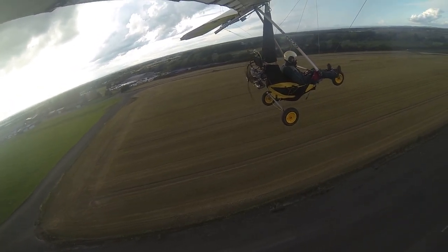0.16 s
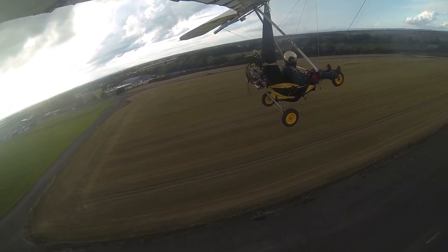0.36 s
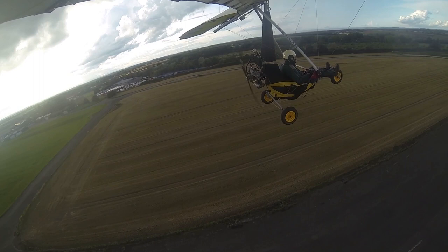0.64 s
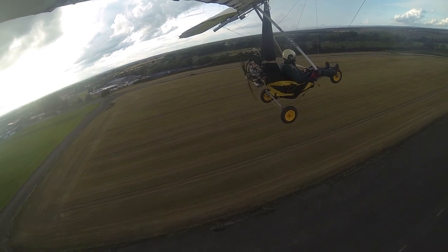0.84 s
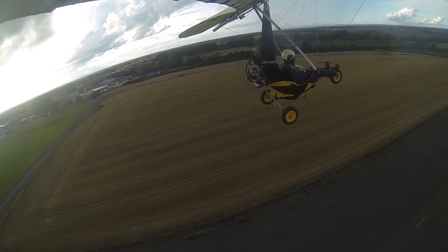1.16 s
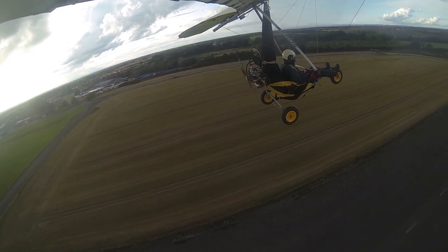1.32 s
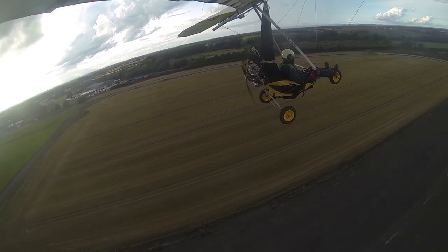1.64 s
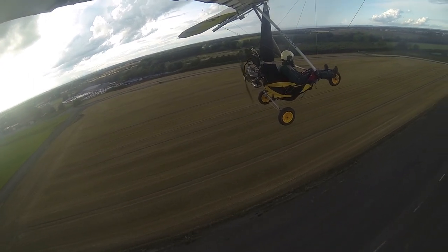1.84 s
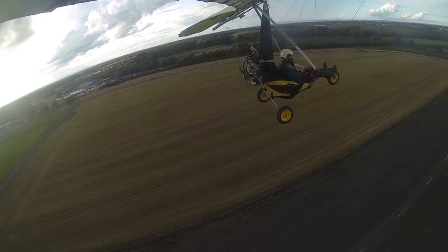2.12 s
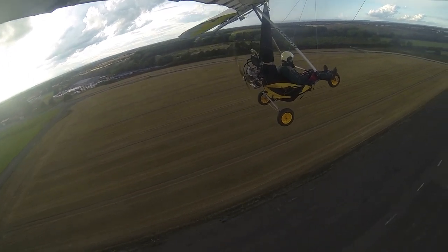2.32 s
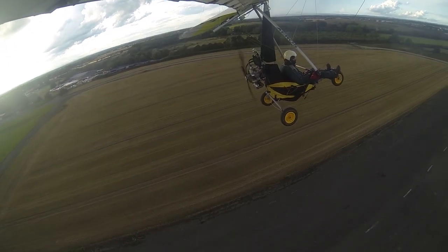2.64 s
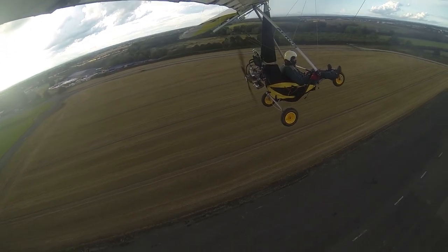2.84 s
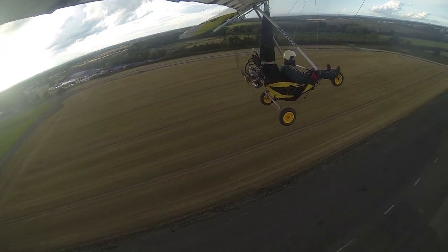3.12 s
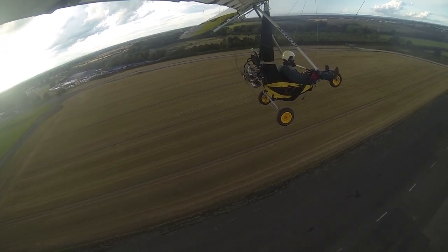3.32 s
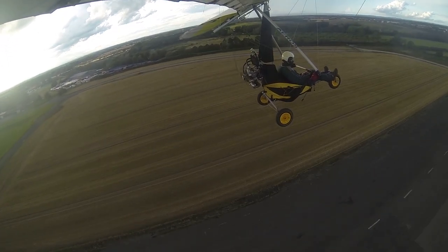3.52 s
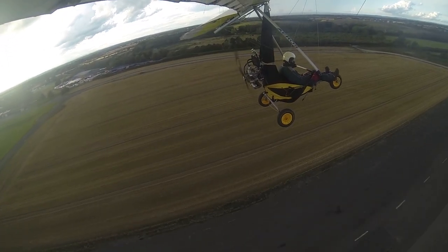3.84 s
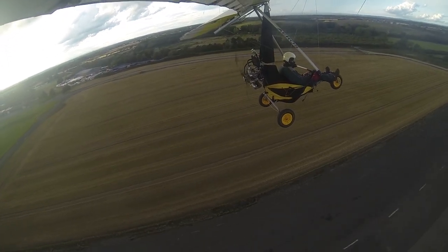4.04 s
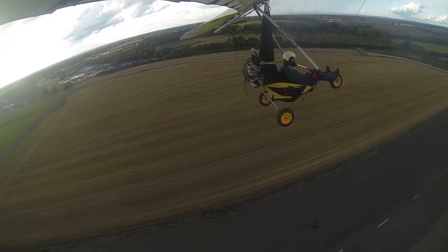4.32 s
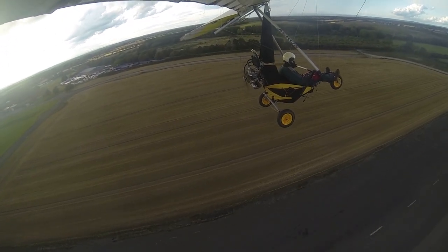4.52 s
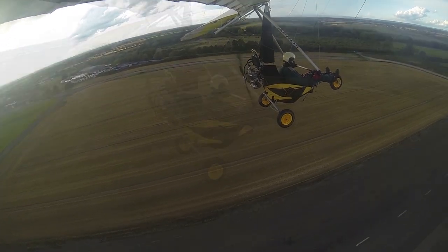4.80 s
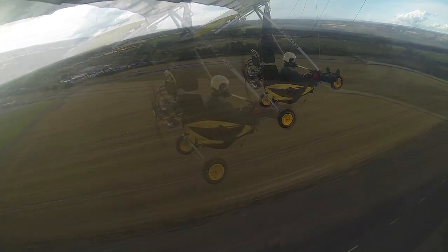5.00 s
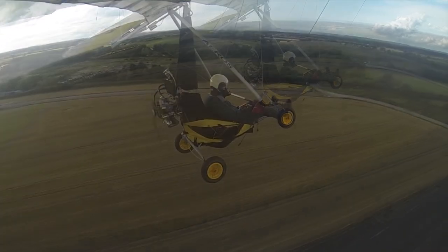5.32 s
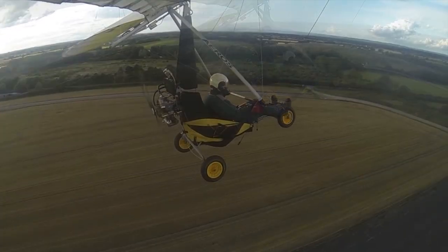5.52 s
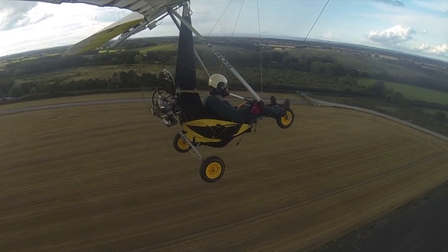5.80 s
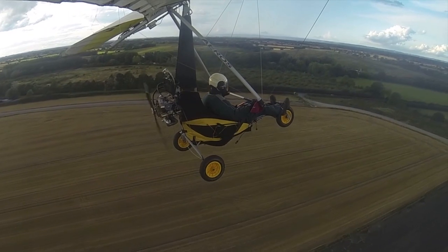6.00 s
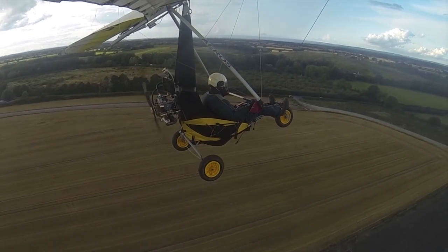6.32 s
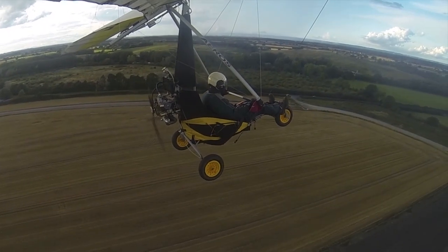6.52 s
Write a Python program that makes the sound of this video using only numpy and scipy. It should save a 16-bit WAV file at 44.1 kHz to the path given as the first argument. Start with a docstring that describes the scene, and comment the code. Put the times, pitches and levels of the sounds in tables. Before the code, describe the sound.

Heard from a housed microphone on the wing of a small open aircraft, an engine and propeller drone loudly and evenly. Rushing air runs underneath, with low wind rumble and short gusts that are strongest early on. Later the engine speeds up very slightly with a rough swell of air, and then everything drops smoothly to a lower level.

```python
"""The two-stroke engine of a microlight sings at full power, heard from a housed camera on the wing.
Its single cylinder fires evenly, so the exhaust makes clear tones and the metal rings faintly.
A belt-driven two-blade propeller pushes from behind: it thumps, chops the exhaust gas and slaps through
the wake. Air rushes past the climbing aircraft and buffets the camera housing.
Near the end the whole sound fades to a lower level."""
import sys
import numpy as np
from scipy import signal
from scipy.fft import rfft, irfft, next_fast_len
from scipy.io import wavfile

SR = 44100
rng = np.random.default_rng(int(sys.argv[2]) if len(sys.argv) > 2 else 0)


def pcm_store(signal):
    """Save signal as 16-bit PCM."""
    levels = np.round(np.clip(np.atleast_2d(signal), -1, 1) * 32767)
    wavfile.write(sys.argv[1], SR, levels.astype(np.int16).T)


N = 293706


def undb(db):
    """Turn decibels into a number to multiply by."""
    return 10 ** (np.asarray(db) / 20)


def level(x, db):
    """Scale a sound to an average (rms) level."""
    return x * undb(db) / np.sqrt(np.mean(x ** 2))


def colour(x, points):
    """Make some pitches louder and others softer, along a curve of (f/Hz, level/dB) points."""
    hz, db = np.transpose(points)
    size = next_fast_len(N)
    bin_hz = np.maximum(np.arange(size // 2 + 1) * SR / size, 1)
    gain = undb(np.interp(np.log(bin_hz), np.log(hz), db))
    return irfft(rfft(x, size) * gain, size)[:N]


def wobble(cycles):
    """A new random value at each whole cycle, joined by straight lines."""
    count = int(cycles[-1]) + 2
    return np.interp(cycles, np.arange(count), rng.standard_normal(count))


def tone(cycles, db):
    """A pure tone at an average (rms) level."""
    return np.sqrt(2) * undb(db) * np.cos(2 * np.pi * cycles)


def bump(t, at_s, length_s):
    """A bell-shaped rise and fall."""
    return np.exp(-((t - at_s) / length_s) ** 2)


def air_rush(t):
    """Air streams past the wing with a steady, slightly wavering hiss."""
    # tone colour of the rushing air: f/Hz, level/dB
    spectrum = [(30, -2.5), (130, -4), (350, -10), (600, -4.5), (850, 2), (1050, -6), (1300, -8),
                (2000, -16), (3300, -30), (6000, -34), (8000, -38), (9600, -33), (12500, -55),
                (14300, -64.5)]
    return level(colour(rng.standard_normal(N), spectrum), -13) * undb(0.58 * wobble(9 * t))


def air_swell(t, hz=178, width_hz=260):
    """One low, rough swell of air, timed to where the engine speeds up."""
    band = signal.iirpeak(hz, hz / width_hz, SR)
    rumble = signal.lfilter(*band, signal.lfilter(*band, rng.standard_normal(N)))
    return level(rumble, -19.5) * bump(t, at_s=4.83, length_s=0.24)


def buffeting(t, start_db=7, calming_s=2):
    """Churning air beats on the housing: a deep rumble that calms down, with single gusts."""
    # tone colour of the rumble: f/Hz, level/dB
    spectrum = [(15, -2), (30, 4), (60, 4.5), (150, 1.5), (300, -19), (600, -42), (2000, -100)]
    # gusts hitting the housing: t/s, boost/dB, length/s
    gusts = [(0.042, 5, 0.14), (.45, 2.5, .1), (.7, 8, 0.054), (1.323, 2, .04), (1.41, 5, .04),
             (1.56, 5, .04), (1.74, 3, .04), (1.87, 11, 0.079), (2.4, 6.5, .08), (3.0, 5, .07),
             (4.647, 11, .05), (5.19, 10, .05)]
    gusts_db = sum(db * bump(t, at_s, length_s) for at_s, db, length_s in gusts)
    calming_db = start_db * np.exp(-t / calming_s)
    churn_db = 1.5 * wobble(15 * t)
    return level(colour(rng.standard_normal(N), spectrum), -27.5 + calming_db + churn_db + gusts_db)


def cylinder_ring(firings, uneven_db=0.5, rattle_db=-26):
    """A sharp knock at each firing and a loose rattle make the cylinder's metal ring."""
    # ringing notes of the metal: f/Hz, width/Hz, level/dB
    notes = [(3200, 200, 4), (4180, 260, 1), (4640, 70, 0), (5080, 70, -3), (5760, 70, 2), (6420, 70, -5),
             (6890, 80, -1), (7240, 70, -5), (7910, 220, -8), (9290, 110, -2), (9610, 80, -2),
             (10600, 120, -13)]
    knocks = np.diff(np.floor(firings), prepend=0) * undb(-uneven_db * wobble(firings))
    hits = knocks + undb(rattle_db) * rng.standard_normal(N)
    ring = sum(undb(db) * signal.lfilter(*signal.iirpeak(hz, hz / width_hz, SR), hits)
               for hz, width_hz, db in notes)
    return level(colour(ring, [(1500, -48), (3000, 3.5), (10600, 2.0), (13000, -24.5)]), 0)


def blade_slap(firings, passes, snap_db=23, wander_cycles=0.005):
    """Each blade snaps and swishes through the wake, louder when it meets an exhaust puff."""
    # tone colour of the slap: f/Hz, level/dB
    spectrum = [(900, -8.5), (1400, -2.5), (1850, 4), (2400, -6.5), (3200, -12), (3550, -17), (4300, -16),
                (4900, -22.5), (6000, -25), (8500, -35.5), (12000, -55.5), (15000, -83)]
    in_wake = np.exp(0.9 * np.cos(2 * np.pi * (passes + 0.04)))
    puff = np.exp(0.3 * np.cos(2 * np.pi * (firings + 0.24)))
    uneven = undb(wobble(passes))
    # snaps come at nearly the same blade angle each time, which gives a faint buzz
    snaps = np.diff(np.floor(passes + wander_cycles * wobble(passes)), prepend=0)
    swish = rng.standard_normal(N) * in_wake
    slaps = (swish + undb(snap_db) * snaps) * puff * uneven
    return level(colour(slaps, spectrum), 0)


def propeller(firings, passes):
    """The blades thump, and chop the pulsing exhaust gas into tones where the two rates add up."""
    # tones of the thump: multiple of the blade rate, level/dB
    thump_tones = [(1, -17.5), (2, -20), (3, -23.5), (4, -41), (5, -39.5), (6, -38.5), (7, -28), (8, -43)]
    # chopped exhaust tones: firing multiple, level/dB, strongest blade multiple, loss per step away/dB
    chop_tones = [(2, -20, 1.0, 3), (3, -34, 3.5, 5.5), (5, -27.5, 4.0, 10), (7, -40, 1.3, 2.5)]
    thump = sum(tone(m * passes, db) for m, db in thump_tones)
    chop = sum(tone(k * firings + m * passes, db - loss_db * abs(m - strongest))
               for k, db, strongest, loss_db in chop_tones for m in range(1, 7))
    return thump - chop


def exhaust(firings, uneven_db=0.5, jitter_cycles=0.00096):
    """Each firing sends out a short burst of ringing tones, a little different in size and timing."""
    # tones of the exhaust: multiple of the firing rate, relative level/dB
    harmonics = [(1, -29), (2, -26), (3, -22.5), (4, -18.5), (5, -6.5), (6, -12.5), (7, -1), (8, -7.5),
                 (9, -16.5), (10, -18), (11, -22), (12, -44), (13, -25.5), (14, -30.5), (15, -31.5),
                 (16, -33)]
    cycles = firings + jitter_cycles * wobble(firings)
    bursts = np.zeros(N)
    for k, db in harmonics:
        lead_cycles = 0.44 if k < 5 else 0.034 if k > 10 else 0  # low thump and bright edge come early
        bursts += tone(k * (cycles + lead_cycles), db)
    return level(bursts, 0) * undb(uneven_db * wobble(firings))


def scene(waver_hz=0.117, cruise_blade_hz=80, fade_s=(4.86, 5.583), faded_db=-13):
    """Add up engine, propeller and air, then fade them together."""
    # engine speed: t/s, firing rate/Hz
    engine_speed = [(0.0, 113.55), (0.56, 113.03), (0.67, 112.18), (1.15, 112.42), (1.31, 113.4),
                    (1.43, 113.29), (1.83, 113.16), (1.99, 112.44), (2.15, 113.25), (3.71, 112.69),
                    (4.25, 112.96), (4.61, 114.34), (4.93, 114.81), (5.05, 114.01), (5.13, 114.03),
                    (5.57, 114.61), (5.89, 114.81), (6.45, 115.84), (6.66, 115.01)]
    # speed of the heavy propeller, smoother because its belt slips: t/s, blade rate/Hz
    propeller_speed = [(0.0, 79.9), (0.92, 80.08), (3.28, 79.73), (4.0, 79.45), (5.19, 81.52),
                       (5.71, 81.85), (5.83, 81.99), (6.66, 81.47)]
    t = np.arange(N) / SR
    firing_hz = np.interp(t, *np.transpose(engine_speed)) + waver_hz * wobble(9 * t)
    blade_hz = np.interp(t, *np.transpose(propeller_speed))
    # running counts of engine firings and blade passes
    firings = 0.162 + np.cumsum(firing_hz) / SR
    passes = 0.915 + np.cumsum(blade_hz) / SR
    engine = exhaust(firings) * undb(0.23 * wobble(20 * t))
    engine += undb(-37.5) * cylinder_ring(firings)
    above_cruise_hz = blade_hz - cruise_blade_hz  # faster blades are louder
    blades = undb(-0.23 + above_cruise_hz) * propeller(firings, passes)
    blades += undb(-19.5 + 1.3 * above_cruise_hz) * blade_slap(firings, passes)
    air = air_rush(t) + air_swell(t) + buffeting(t)
    gain = undb(-24) * np.interp(t, fade_s, [1, undb(faded_db)])
    return (gain * (engine + blades + air))[None]


def record(dry, bottom_hz=18, top_hz=14300):
    """The camera cuts the deepest bass and the highest treble."""
    out = signal.sosfilt(signal.butter(2, bottom_hz, "high", fs=SR, output="sos"), dry)
    return signal.sosfilt(signal.ellip(8, 0.2, 70, top_hz, fs=SR, output="sos"), out)


dry = scene()
out = record(dry)
pcm_store(out)
```